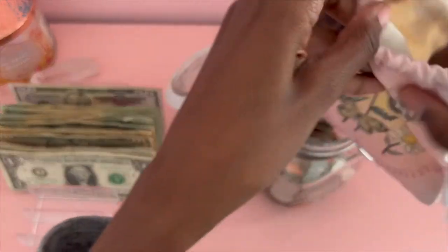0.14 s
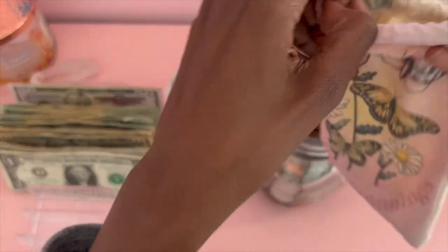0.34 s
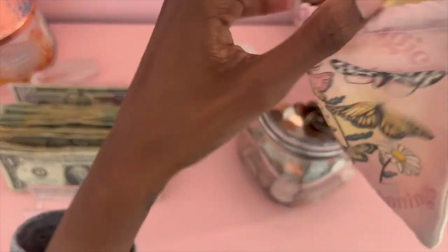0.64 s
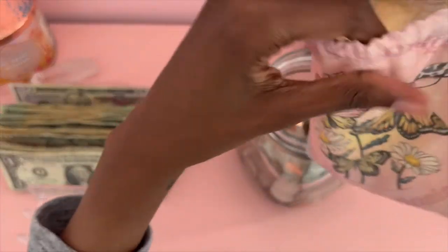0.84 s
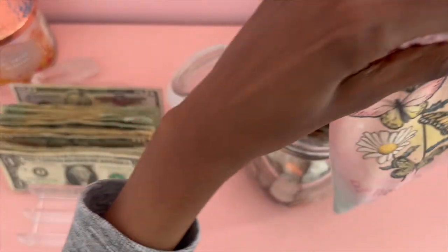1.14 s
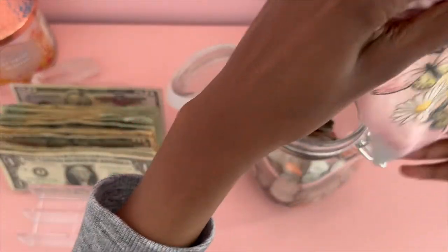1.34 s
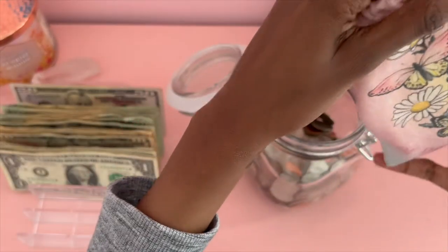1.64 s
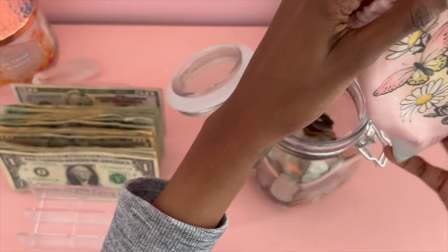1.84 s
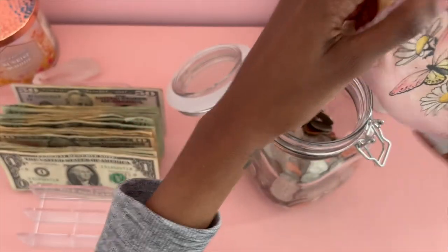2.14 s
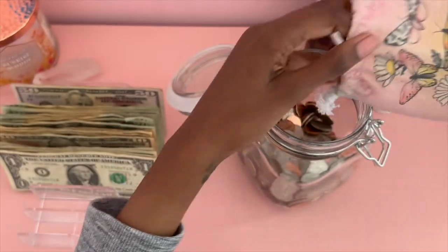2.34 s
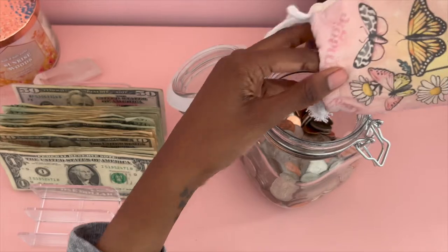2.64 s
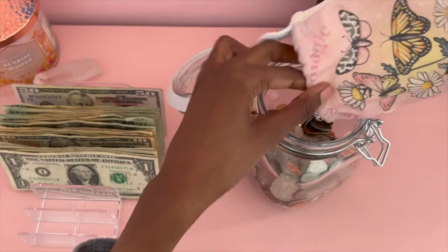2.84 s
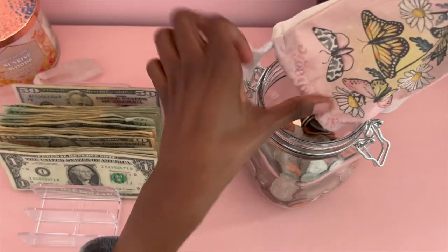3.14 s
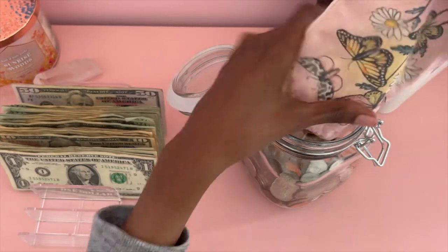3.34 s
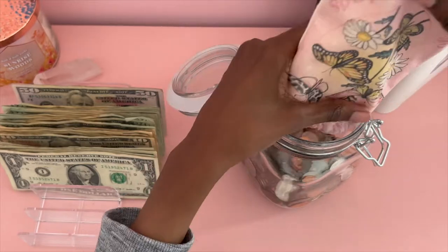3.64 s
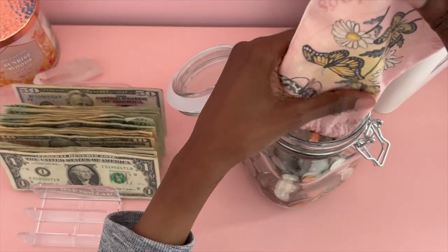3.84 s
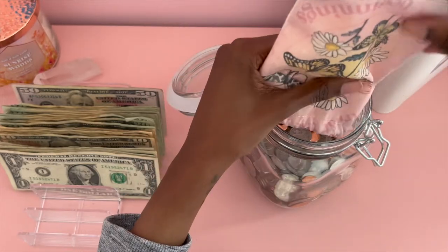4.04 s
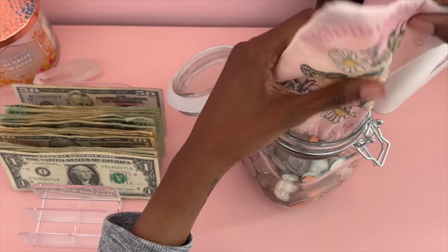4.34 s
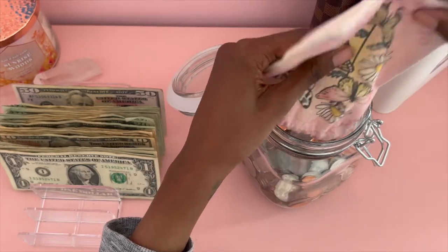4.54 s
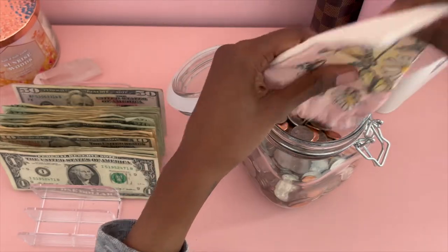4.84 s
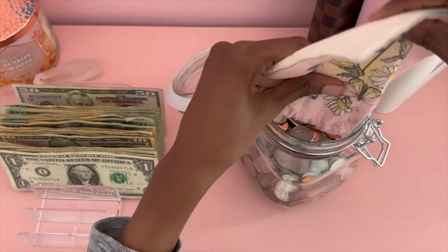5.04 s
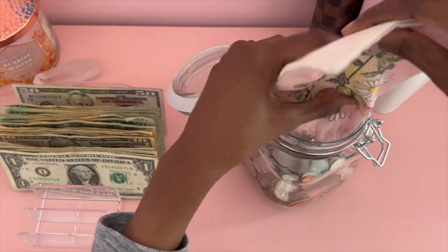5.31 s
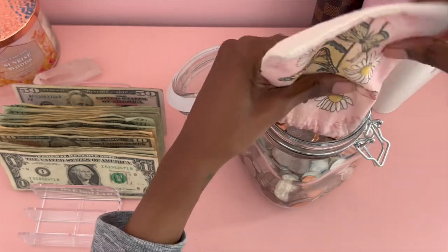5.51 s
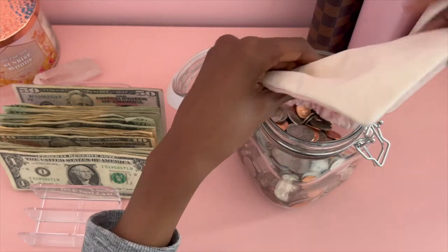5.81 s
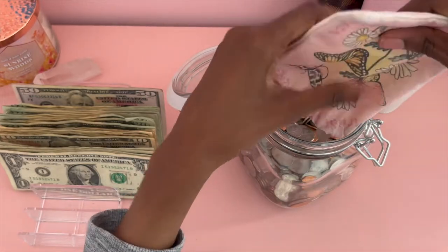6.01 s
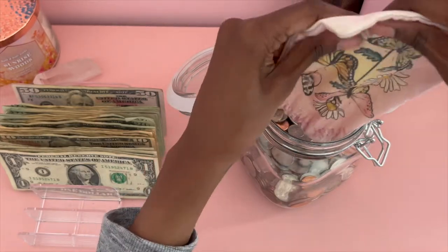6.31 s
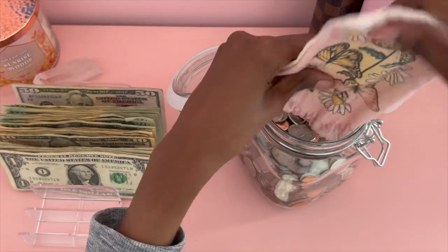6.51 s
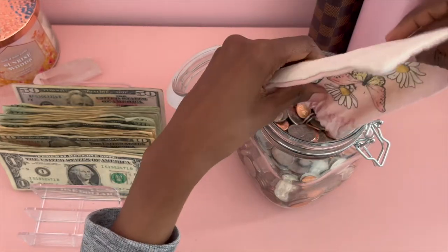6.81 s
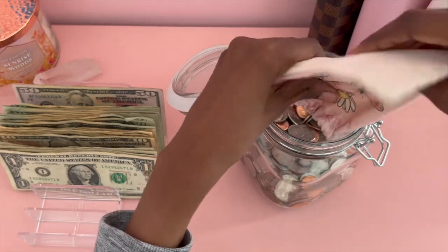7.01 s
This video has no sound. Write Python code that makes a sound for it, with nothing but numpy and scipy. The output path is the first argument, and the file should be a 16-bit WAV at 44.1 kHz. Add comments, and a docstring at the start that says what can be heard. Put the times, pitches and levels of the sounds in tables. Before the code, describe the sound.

A cloth pouch rustles softly as it is handled, and the coins inside give small muffled clinks. They start to slide, then pour into a part-filled glass jar in one loud, bright rush, thudding on the pile and briefly ringing the glass. The last few are shaken loose and drop in separately. The microphone is close, in a small quiet room with a low appliance hum.

```python
"""A table in a small, quiet room, one microphone close by; an appliance hums throughout.
First a cloth pouch rustles in the hand and the coins inside clink, then begin to slide at about 2.4 s.
Near 3.5 s they pour into a part-filled glass jar in one rush, thudding on the pile or ringing the glass.
From 4.3 s the last few are shaken loose and drop in; the cloth is still rustling at the end, near 7 s."""
import sys
import numpy as np
from scipy import signal
from scipy.fft import rfft, irfft, next_fast_len
from scipy.io import wavfile
from scipy.ndimage import uniform_filter1d, minimum_filter1d

SR = 44100
rng = np.random.default_rng(int(sys.argv[2]) if len(sys.argv) > 2 else 0)


def transcribe(signal):
    """Save signal, clipped to [-1, 1], as a 16-bit WAV file at the path in sys.argv[1]."""
    frames = np.atleast_2d(signal).T
    limited = np.clip(frames, -1, 1)
    pcm = np.round(limited * 32767).astype(np.int16)
    wavfile.write(sys.argv[1], SR, pcm)


N = 316197
TIME = np.arange(N) / SR
RING_TIME, BLOW_TIME = TIME[:SR // 2], TIME[:SR // 5]


def from_db(db):
    """Decibels to gain."""
    return 10 ** (np.asarray(db) / 20)


def rms_one(x):
    """Scale to rms 1."""
    return x / np.sqrt(np.mean(x ** 2) + 1e-20)


def unit_energy(x):
    """Scale a response so that it passes white noise at equal power."""
    return x / np.sqrt(np.sum(x ** 2) + 1e-20)


def at_peak(sound, db):
    """Set the height of the strongest swing."""
    return from_db(db) * sound / np.max(np.abs(sound))


def at_hz(points, hz):
    """Read a curve on a log-frequency axis."""
    known_hz, values = np.transpose(points)
    return np.interp(np.log(np.maximum(hz, 1)), np.log(known_hz), values)


def level(rows):
    """Gain over time from a dB curve, silent outside it."""
    return from_db(np.interp(TIME, *np.transpose(rows), left=-200, right=-200))


def noise(spectrum, size=N):
    """Coloured noise of rms 1."""
    padded = next_fast_len(size)
    hz = np.fft.rfftfreq(padded, 1 / SR)
    white = rfft(rng.standard_normal(padded))
    return rms_one(irfft(white * from_db(at_hz(spectrum, hz)), padded)[:size])


def drift(per_s):
    """A random wander of rms 1."""
    knots = rng.standard_normal(4000)
    return rms_one(np.interp(TIME * per_s, np.arange(len(knots)), knots))


def add(track, start_s, sound):
    """Mix a sound in at a time."""
    start = max(int(start_s * SR), 0)
    track[start:start + len(sound)] += sound[:N - start]


def ringing(modes, uneven_db, detune):
    """One blow on a set of modes; strengths and pitches depend on where it lands."""
    hz, db, t60_s = np.array(modes).T[:, :, None]
    strength, shift, side = rng.standard_normal((3, len(modes), 1))
    waves = np.sign(side) * np.sin(2 * np.pi * hz * (1 + detune * shift) * BLOW_TIME)
    decays = from_db(db + uneven_db * strength - 60 * BLOW_TIME / t60_s)
    return unit_energy(np.sum(waves * decays, axis=0))


def crack(spectrum, t60_s):
    """The short burst of a contact jostling its neighbours."""
    return unit_energy(noise(spectrum, size=len(BLOW_TIME)) * from_db(-60 * BLOW_TIME / t60_s))


def shower(response, gain, per_s, uneven_db, objects=5):
    """Random collisions under a level curve, dealt among a few differently ringing objects."""
    sizes = from_db(uneven_db * np.clip(rng.standard_normal(N), -2, 2)) * rng.choice([-1, 1], N)
    clicks = gain * rms_one(sizes * (rng.random(N) < per_s / SR))
    struck = rng.integers(0, objects, N)
    return sum(signal.oaconvolve(clicks * (struck == k), unit_energy(response()))[:N]
               for k in range(objects))


# the appliance as heard at the table: time_s, level_db
HUM_LEVEL = [(0.0, -44), (0.5, -42), (1.8, -42), (3.6, -46.5), (4.4, -42), (5.5, -42.5), (6.3, -45.5),
             (7.17, -44)]
# lines of its hum: pitch_hz, relative_db
HUM_LINES = [(58.8, 1), (84, -24), (119, -31), (239.3, -25)]
# low rumble of the room: frequency_hz, relative_db
RUMBLE_SPECTRUM = [(20, 12), (30, -5.5), (45, -11), (75, -16), (100, -19.5), (130, -10.5), (175, -27),
                   (260, -28.5), (350, -26.5), (580, -30.5), (750, -36), (1500, -43), (5000, -46),
                   (15000, -54)]
def room_tone():
    """Behind everything, a slightly unsteady motor hums over the rumble of the room."""
    wavering_s = TIME + .0006 * drift(per_s=0.89)
    hum = sum(from_db(db) * np.sin(2 * np.pi * hz * wavering_s) for hz, db in HUM_LINES)
    return np.sqrt(2) * level(HUM_LEVEL) * hum + from_db(-45.5) * noise(RUMBLE_SPECTRUM)


# room resonances that colour the echoes: frequency_hz, relative_db
ROOM_COLOUR = [(80, -6), (135, 4), (190, -9), (250, 1), (300, 0), (350, 2), (700, -.5), (1500, 0),
               (15000, 0)]
# how long the room rings: frequency_hz, t60_s
ROOM_DECAY = [(130, 0.57), (500, 0.39), (1500, 0.49), (3500, 0.36), (8000, 0.3), (15000, 0.29)]
def room_response(first_echo_s):
    """Diffuse echoes off the near walls build up after the first one and die band by band."""
    t, hz = TIME[:SR], np.fft.rfftfreq(SR, 1 / SR)
    coloured = rfft(rng.standard_normal(SR)) * from_db(at_hz(ROOM_COLOUR, hz))
    edges_hz = np.geomspace(70, SR / 2, 12)
    tail = np.zeros(SR)
    for low, high in zip(edges_hz, edges_hz[1:]):
        band = irfft(coloured * (hz >= low) * (hz < high), SR)
        tail += band * from_db(-60 * t / at_hz(ROOM_DECAY, np.sqrt(low * high)))
    return unit_energy(tail * np.clip(t / first_echo_s - 1, 0, 1))


def air_sway():
    """A very deep flutter rocks the air at the microphone for about a second."""
    start_s, length_s, sway_hz = 0.515, 1.06, 4.3
    rocking = np.sqrt(np.sin(np.pi * np.clip((TIME - start_s) / length_s, 0, 1)))
    sway = from_db(-18.5) * rocking * np.sin(2 * np.pi * sway_hz * TIME)
    return signal.sosfilt(signal.butter(2, 12, fs=SR, output="sos"), sway)


# strokes of the hand on the pouch, levels relative: peak_s, length_s, rub_db, flap_db
HAND_STROKES = [(0.105, 0.18, -68, -60), (0.221, 0.49, -68, -75), (0.442, 0.28, -65.5, -65),
                (0.76, .4, -72, -70), (0.99, 0.079, -68.5, -65), (1.077, 0.098, -66.5, -72),
                (1.16, 0.09, -75, -63), (1.626, 0.14, -66, -64.5), (2.496, 0.46, -61, -58.5),
                (2.683, 0.19, -71, -54), (3.17, 0.18, -66, -55), (3.36, 0.27, -64, -54.5),
                (4.042, 0.098, -65.5, -56.5), (4.323, 0.26, -68.5, -58.5), (4.685, 0.1, -62, -67),
                (4.811, 0.14, -57.5, -53.5), (4.943, 0.074, -82.5, -56), (5.042, 0.12, -67.5, -61),
                (5.533, 0.14, -71.5, -62.5), (5.673, 0.1, -68.5, -58), (5.812, 0.064, -70, -75),
                (5.943, 0.098, -71, -58), (6.427, 0.21, -64.5, -59.5), (6.715, 0.18, -68.5, -61.5),
                (6.844, 0.12, -67.5, -68), (7.025, 0.099, -68.5, -60.5)]
# cloth rubbing: frequency_hz, relative_db
RUB_SPECTRUM = [(590, -20), (1000, -2), (1120, -13.5), (1220, -14.5), (1850, -15.5), (2400, -7.5),
                (5070, -13.5), (6630, -11), (16000, -25.5)]
# cloth flapping: frequency_hz, relative_db
FLAP_SPECTRUM = [(150, -26), (250, -7.5), (265, -11.5), (432, -2), (487, -9.5), (583, -5.5), (1500, -39),
                 (1950, -53.5), (3300, -120)]
def cloth():
    """The pouch rubs and flaps as each stroke of the hand speeds up and slows down again."""
    rise_share, edge_db = 0.57, -13.5   # part of a stroke spent speeding up; level at its two ends
    rubbing, flapping = np.zeros((2, N))
    for peak_s, length_s, rub_db, flap_db in HAND_STROKES:
        start_s = max(peak_s - length_s, 0)
        phase = (start_s + TIME[:SR] - peak_s) / length_s
        stroke = from_db(edge_db * np.maximum(-phase / rise_share, phase / (1 - rise_share)))
        add(rubbing, start_s, from_db(rub_db) * stroke)
        add(flapping, start_s, from_db(flap_db - 1.5) * stroke)
    rub = rubbing * noise(RUB_SPECTRUM) * from_db(1.5 * drift(per_s=36))
    flap = flapping * noise(FLAP_SPECTRUM) * from_db(1.3 * drift(per_s=30))
    return rub + flap


# the mouth of the pouch: time_s, open_share
POUCH_MOUTH = [(0, 0.64), (.7, 0.75), (1.6, 0.4), (2.1, 0.65), (2.45, 0.85)]
def through_cloth(sound):
    """Fabric between coins and microphone soaks up treble, less so as the mouth opens."""
    muffled = signal.sosfilt(signal.butter(2, 11000, fs=SR, output="sos"), sound)
    opening = np.interp(TIME, *np.transpose(POUCH_MOUTH))
    return muffled + opening * (sound - muffled)


# the whole heap slides in the tilted pouch: time_s, relative_db
HEAP_SLIDE = [(2.31, -64.5), (2.476, -36), (2.6, -45.5), (2.66, -41), (2.87, -58), (3.12, -60), (3.16, -44),
              (3.384, -42.5), (3.412, -31), (3.468, -39), (3.545, -23.5), (3.61, -29), (3.74, -32.5),
              (3.98, -65.5)]
# a jolt makes a handful slip and settle: start_s, relative_db
SLIPS = [(.47, -46.5), (1.411, -45), (1.477, -45.5), (1.618, -40), (1.885, -46), (2.66, -58), (2.93, -44),
         (3.143, -37), (3.16, -39), (3.41, -35), (4.445, -31.5), (4.487, -32), (4.625, -39), (5.055, -54),
         (5.219, -31), (5.25, -35.5), (5.315, -51.5), (6.135, -29.5)]
def sliding_level():
    """The long slide of the heap, plus short slips that start at once and die away."""
    attack_s, t60_s = .005, 0.13
    gain = level(HEAP_SLIDE)
    slip = (1 - np.exp(-RING_TIME / attack_s)) * from_db(-60 * RING_TIME / t60_s)
    for start_s, db in SLIPS:
        add(gain, start_s, from_db(db) * slip)
    return gain


# tick of metal on metal: frequency_hz, relative_db
TICK_SPECTRUM = [(300, -9), (1500, -22.5), (2500, -15.5), (4200, -7.5), (6000, -4.5), (8000, -0.5),
                 (11000, 2), (15500, 1.5)]
# modes of coins of several sizes: pitch_hz, relative_db, t60_s
COIN_MODES = [(9200, -1.5, 0.042), (9623, -2, 0.042), (12586, -10, .025), (12800, 0.5, 0.043),
              (13350, -4.5, 0.035), (14740, -2, .02), (14600, 1, 0.091), (16056, -2.5, 0.055)]
def coin_touch(ring_db, tick_t60_s):
    """Two coins meet: a bright chattering tick and the choked ring of the discs."""
    tick = crack(TICK_SPECTRUM, tick_t60_s)
    return tick + from_db(ring_db) * ringing(COIN_MODES, uneven_db=1.0, detune=0.0046)


# coin against coin, inside the cloth: start_s, peak_db
CLINKS = [(0.193, -39), (0.2407, -34), (0.272, -38.5), (0.398, -42.5), (0.456, -41), (0.535, -42.5),
          (1.045, -46), (1.068, -44), (1.4145, -34.5), (1.62, -30), (1.695, -39.5), (1.788, -38),
          (1.831, -38), (1.8757, -37), (1.993, -48.5), (2.065, -47), (2.291, -46.5), (2.409, -31.5),
          (2.455, -26), (2.899, -40), (2.932, -34), (3.063, -39.5), (3.143, -25.5), (3.166, -32),
          (3.409, -20.5), (3.4958, -27), (3.5323, -13), (3.554, -16), (3.642, -13), (3.916, -44),
          (4.317, -43), (4.406, -30.5), (4.622, -30.5), (4.778, -40), (4.8148, -27.5), (5.004, -39.5),
          (5.055, -41.5), (5.218, -24.5), (5.3154, -30), (6.115, -29)]
def pouch_coins():
    """In the pouch, coins clink, scrape and jingle as they slide over one another."""
    clinks = np.zeros(N)
    for start_s, peak_db in CLINKS:
        add(clinks, start_s, at_peak(coin_touch(ring_db=-7, tick_t60_s=.045), peak_db))
    sliding = sliding_level()
    scrape = shower(lambda: coin_touch(ring_db=-6.5, tick_t60_s=0.011),
                    from_db(-3.5) * sliding, per_s=550, uneven_db=3.5)
    jingle = shower(lambda: ringing(COIN_MODES, uneven_db=2, detune=0.0071),
                    from_db(-6) * sliding, per_s=130, uneven_db=3, objects=8)
    return through_cloth(clinks + scrape + jingle)


# coins left free to ring: start_s, pitch_hz, level_db
FREE_RINGS = [(.194, 9230, -46), (1.475, 9260, -55), (1.885, 12900, -52), (2.372, 9230, -53),
              (2.44, 12900, -43), (2.5, 9250, -49), (2.64, 9260, -47), (2.66, 12800, -44),
              (2.935, 15300, -44), (2.955, 9300, -45), (3.142, 14820, -36), (3.17, 9330, -38),
              (3.41, 15400, -30), (3.415, 9300, -36), (3.62, 15350, -28), (3.71, 15290, -26),
              (3.75, 11413, -29), (3.765, 15400, -26), (4.398, 15590, -36), (4.317, 9250, -56),
              (4.406, 15250, -31), (4.575, 9400, -46), (5.05, 9300, -51), (5.06, 11950, -54),
              (5.218, 15560, -38), (5.222, 9400, -39), (5.24, 11900, -44), (5.245, 12800, -44),
              (5.317, 9450, -42), (6.116, 9230, -37), (6.118, 15290, -23), (6.145, 15320, -26)]
def free_coins():
    """A coin that swings clear holds one note; its stamped face splits the mode into a beating pair."""
    attack_s, split_hz, t60_cycles, tail_t60_s = .002, 45, 2300, .5
    out = np.zeros(N)
    attack = 1 - np.exp(-RING_TIME / attack_s)
    tail = from_db(-20 - 60 * RING_TIME / tail_t60_s)   # a faint part of the note outlasts the rest
    for start_s, pitch_hz, level_db in FREE_RINGS:
        decay = np.maximum(from_db(-60 * RING_TIME * pitch_hz / t60_cycles), tail)
        twin_hz = pitch_hz + split_hz * rng.uniform(0.25, 1.8)
        note = np.sin(2 * np.pi * pitch_hz * RING_TIME)
        twin = from_db(-7) * np.sin(2 * np.pi * twin_hz * RING_TIME)
        add(out, start_s, from_db(level_db) * (note + twin) * attack * decay)
    return out


def pour_level():
    """The rush swells quickly, sags as the pouch empties and then runs out."""
    start_s, full_s, ebb_s = 3.49, 3.55, 3.72
    sag_db_per_s, ebb_db_per_s = 35.5, 233.5
    swell_db = np.interp(TIME, [start_s, full_s], [-18, 0])
    sag_db = sag_db_per_s * np.maximum(TIME - full_s, 0)
    ebb_db = ebb_db_per_s * np.maximum(TIME - ebb_s, 0)
    return (TIME >= start_s) * from_db(np.maximum(swell_db - sag_db - ebb_db, -200))


# the jar on the table, heavily damped: pitch_hz, relative_db, t60_s
TABLE_MODES = [(135, -14, .04), (260, -5, .024), (340, 0, .02), (420, -1, .018), (500, -2, .016),
               (650, -5, .013), (980, -14, .012), (1500, -16, .008)]
def table_knock():
    """The weight of a coin goes through the pile into the table."""
    return ringing(TABLE_MODES, uneven_db=2.5, detune=0.058)


# coins landing on the pile: start_s, thud_db, crack_db
LANDINGS = [(3.397, -18.5, -25.5), (3.496, -23.5, -14.5), (3.523, -20, -10.5), (3.556, -29, -9),
            (3.57, -20, -30.5), (3.659, -34, -24), (3.706, -22.5, -40), (3.7405, -22.5, -23),
            (3.917, -36, -40), (4.4452, -22.5, -27.5), (4.456, -56, -53), (4.4856, -20.5, -21.5),
            (4.498, -53, -35), (4.5074, -38.5, -29), (4.621, -32.5, -36), (5.2175, -27.5, -36.5),
            (5.236, -37, -51), (5.315, -33.5, -33), (6.1057, -20, -23), (6.112, -34, -16),
            (6.567, -44, -73), (6.627, -46.5, -62.5)]
# crack of the struck pile: frequency_hz, relative_db
PILE_SPECTRUM = [(300, 6.5), (1000, -3), (1900, -22.5), (2500, 3.5), (3500, 7.5), (5000, 3), (8000, 1),
                 (11000, 0), (15500, 4)]
def pile():
    """Down in the jar, coins land with a thud and a dry crack; the rush drums on the heap."""
    blows = np.zeros(N)
    for start_s, thud_db, crack_db in LANDINGS:
        add(blows, start_s, at_peak(table_knock(), thud_db + 0.04))
        add(blows, start_s, at_peak(crack(PILE_SPECTRUM, t60_s=0.062), crack_db))
    return blows + shower(table_knock, from_db(-36) * pour_level(), per_s=160, uneven_db=2.5)


# modes of the jar wall: pitch_hz, relative_db, t60_s
GLASS_MODES = [(2413, -18, .05), (2434, -19, .045), (2600, -13, .018), (3190, -10, .025), (3270, -8, .025),
               (3380, -7, .03), (3515, -7, .03), (3600, -6, .03), (3700, -9, .025), (3984, -10, .012),
               (5122, -8, .018), (6043, -11, .016), (6718, -13, .016), (7230, -14, .016), (8200, -5, .022)]
def glass_ring(favoured_hz):
    """The jar wall rings, soon choked by the coins inside; the spot struck brings out some modes."""
    boost_db, reach_hz = 7, 130
    hz, db, t60_s = np.transpose(GLASS_MODES)
    db = db + boost_db * np.exp(-((hz - favoured_hz) / reach_hz) ** 2)
    return ringing(np.column_stack([hz, db, t60_s]), uneven_db=0, detune=0.0007)


# coin against glass, levels relative: start_s, ring_db, crack_db, favoured_hz
GLASS_HITS = [(3.3977, -21, -21.5, 3180), (3.41, -26.5, -18, 3340), (3.533, -9, -7.5, 3400),
              (3.5458, -18, -13, 2410), (3.5525, -4, -4, 3640), (3.5534, -0.5, -15, 3248),
              (3.597, -16, -22, 2450), (3.628, -10, -8.5, 3370), (3.6432, -3, -7.5, 3590),
              (3.646, -9, -25, 3550), (3.7387, -36, -42, 3350), (4.397, -39, -24, 3320),
              (4.405, -48, -27, 3400), (4.5084, -21.5, -18.5, 3260), (4.813, -29.5, -15.5, 3500),
              (5.2172, -31, -28, 3396), (6.1116, -8.5, -8, 3610), (6.113, -20.5, -12.5, 3530)]
# crack of metal on glass: frequency_hz, relative_db
GLASS_SPECTRUM = [(300, -11.5), (1900, -17.5), (2500, -4.5), (3500, 4), (5000, 2), (6700, 14.5), (8300, 2),
                  (9500, -8), (15500, -13.5)]
def jar():
    """In the foreground, single blows crack and ring the glass; the rush rattles all over it."""
    def rattle():
        return glass_ring(rng.uniform(2300, 3700)) + from_db(1.5) * crack(GLASS_SPECTRUM, t60_s=0.01)

    blows = np.zeros(N)
    for start_s, ring_db, crack_db, favoured_hz in GLASS_HITS:
        add(blows, start_s, at_peak(glass_ring(favoured_hz), ring_db - 1))
        add(blows, start_s, at_peak(crack(GLASS_SPECTRUM, t60_s=0.017), crack_db - 5))
    return blows + shower(rattle, from_db(-31) * pour_level(), per_s=230, uneven_db=8, objects=8)


def scene():
    """At the microphone: the coins, direct and off the walls, over dry cloth and room tone."""
    blows = pouch_coins() + jar() + pile()
    notes = free_coins()
    into_room = from_db(-3) * (blows + from_db(-12) * notes)
    echoes = signal.oaconvolve(into_room, room_response(first_echo_s=0.0024))[:N]
    return (blows + notes + echoes + cloth() + air_sway() + room_tone())[None]


def record(dry):
    """Behind the microphone, a fast limiter holds the loudest blows down and the top is cut."""
    ceiling, cutoff_hz = .55, 15900
    top_cut = signal.ellip(12, .1, 80, cutoff_hz, fs=SR, output="sos")
    heard = signal.sosfilt(top_cut, dry)
    allowed = np.minimum(1, ceiling / (np.abs(heard) + 1e-9))
    gain = uniform_filter1d(minimum_filter1d(allowed, size=45), size=23)   # hold about 1 ms, then smooth
    return signal.sosfilt(top_cut, heard * gain)


dry = scene()
out = record(dry)
transcribe(out)
```